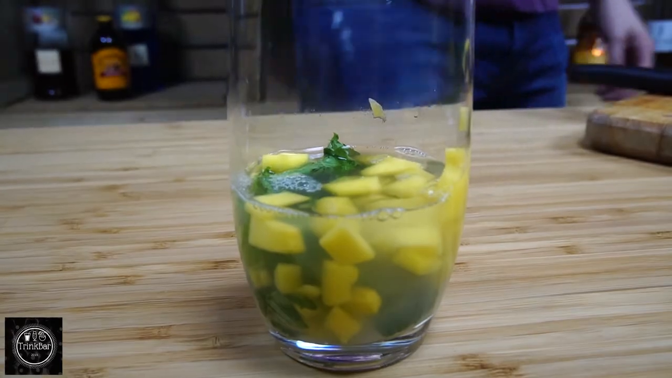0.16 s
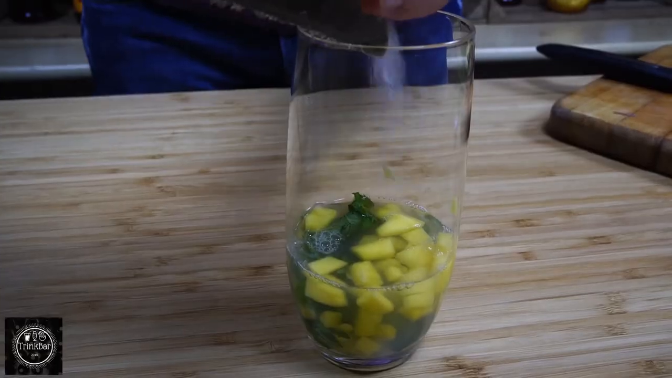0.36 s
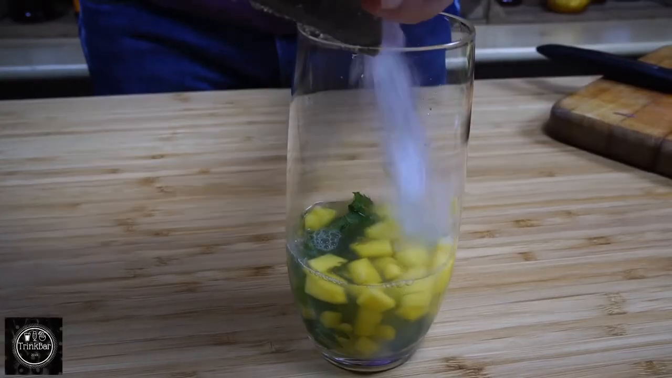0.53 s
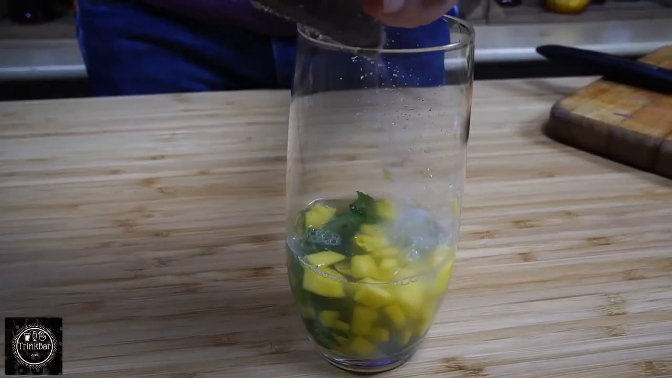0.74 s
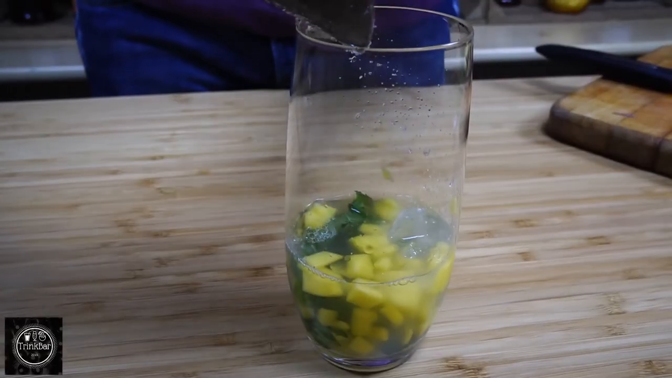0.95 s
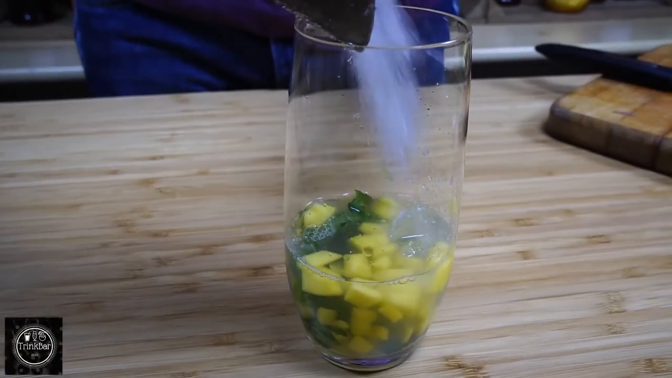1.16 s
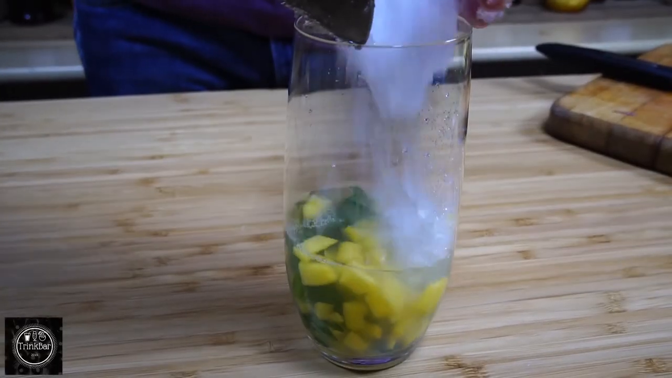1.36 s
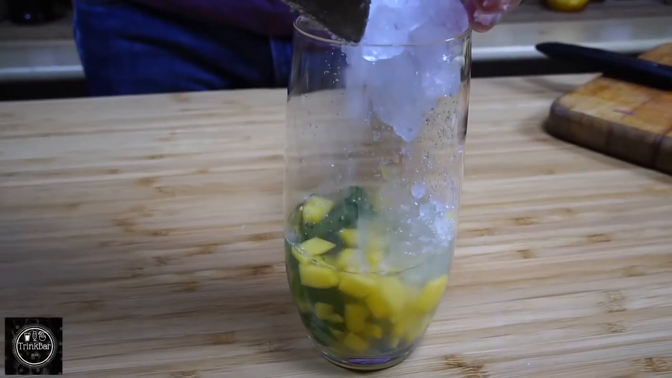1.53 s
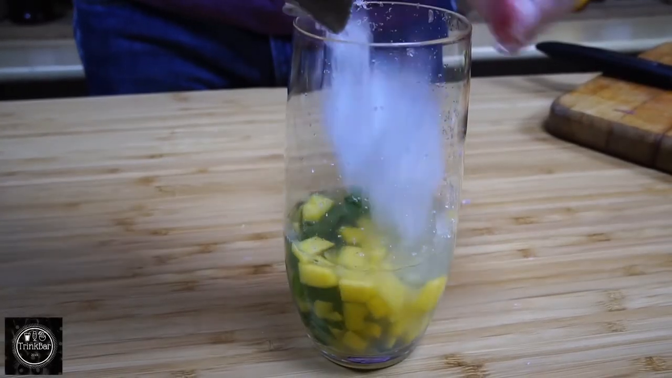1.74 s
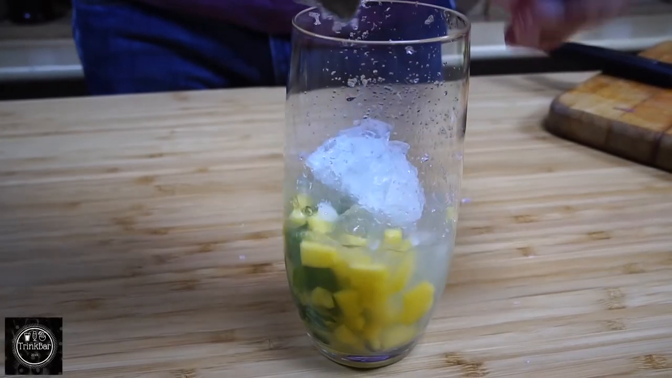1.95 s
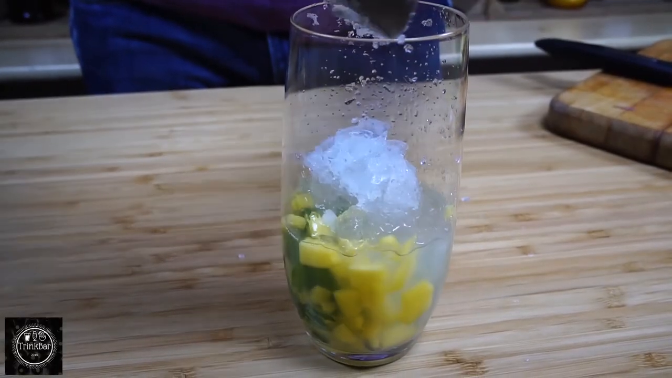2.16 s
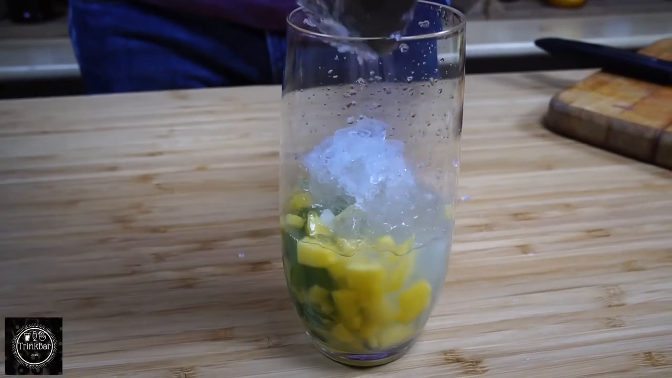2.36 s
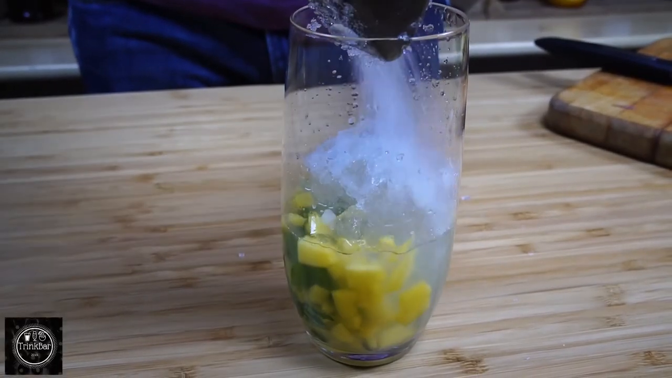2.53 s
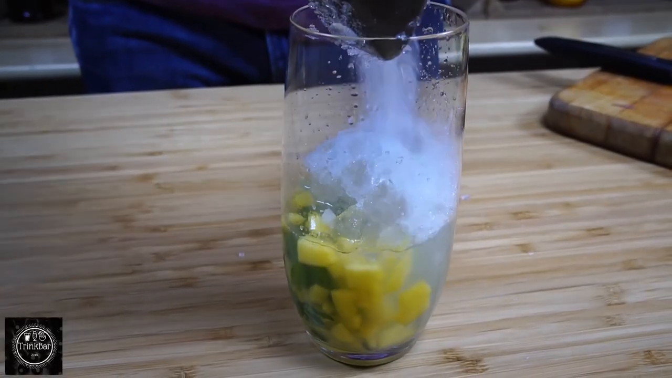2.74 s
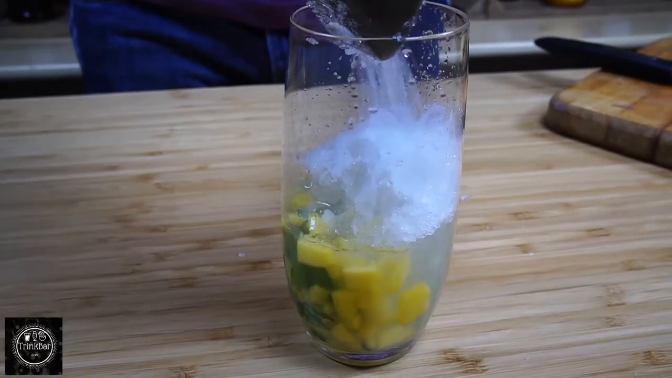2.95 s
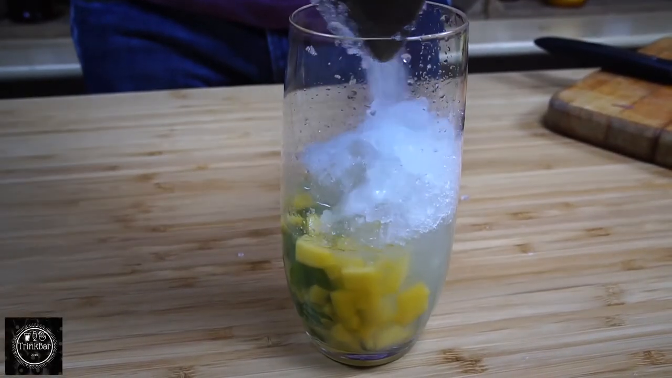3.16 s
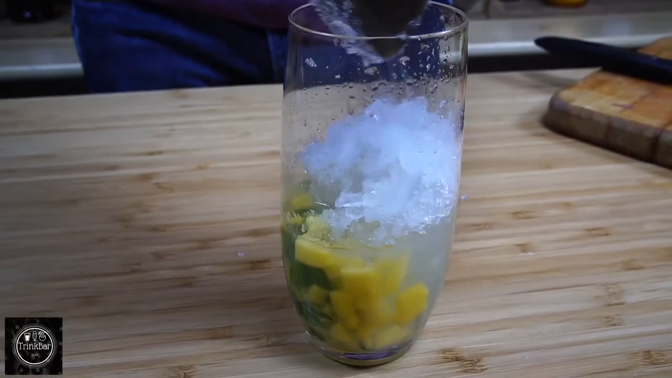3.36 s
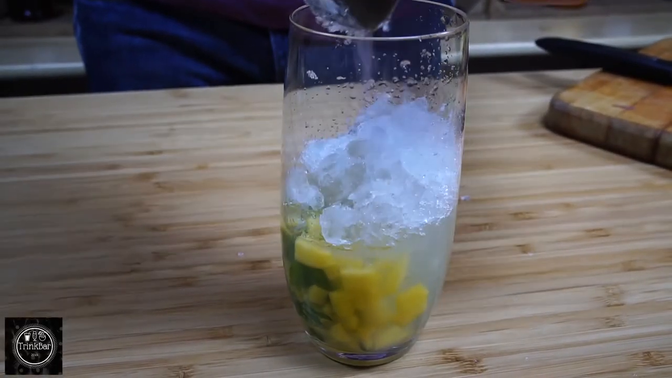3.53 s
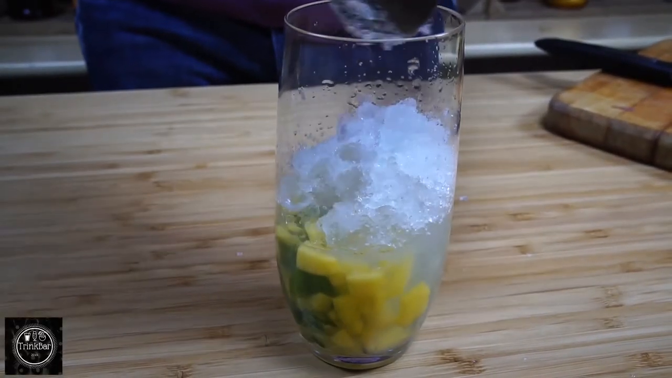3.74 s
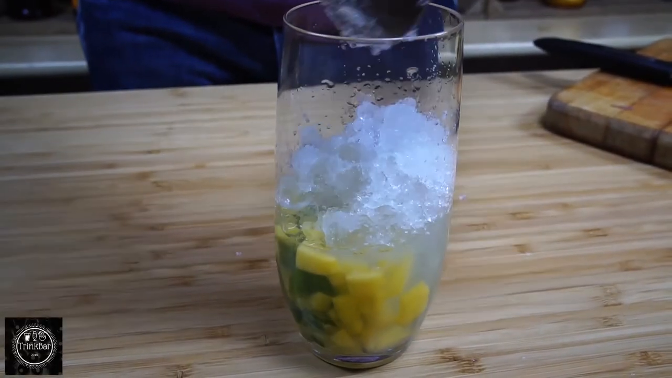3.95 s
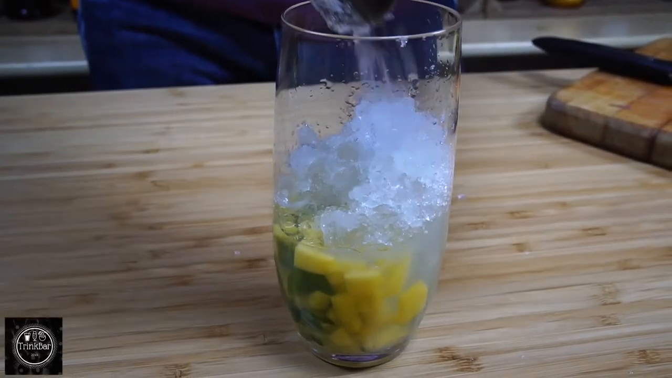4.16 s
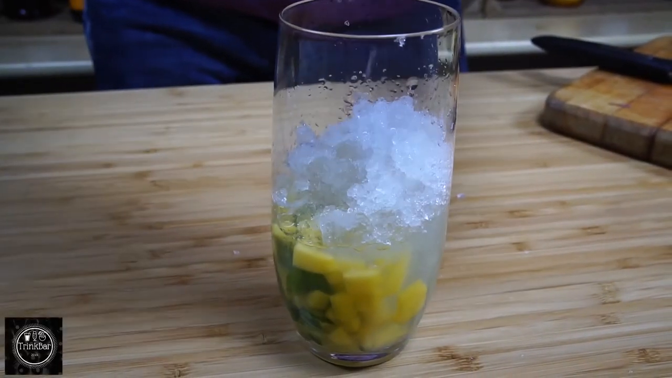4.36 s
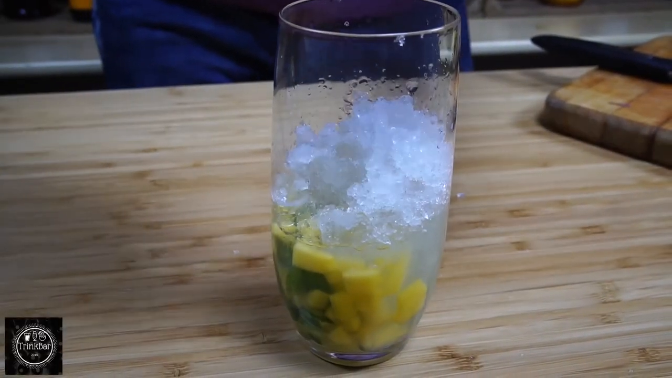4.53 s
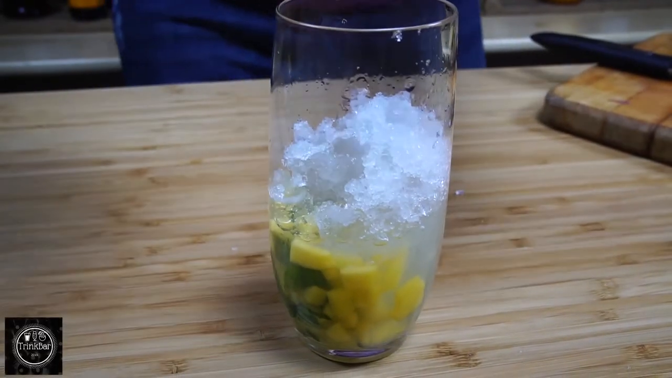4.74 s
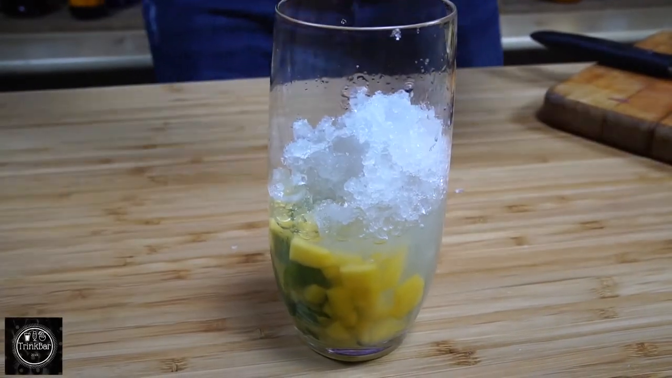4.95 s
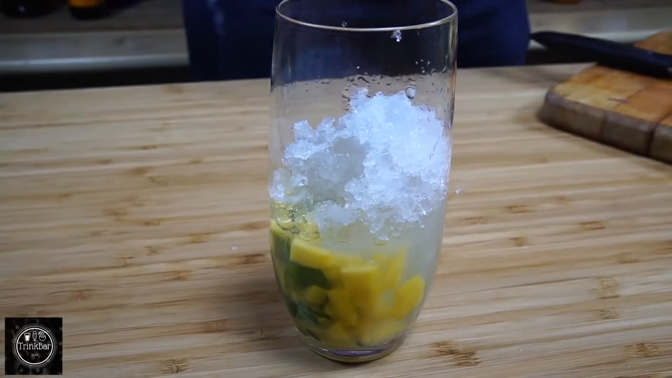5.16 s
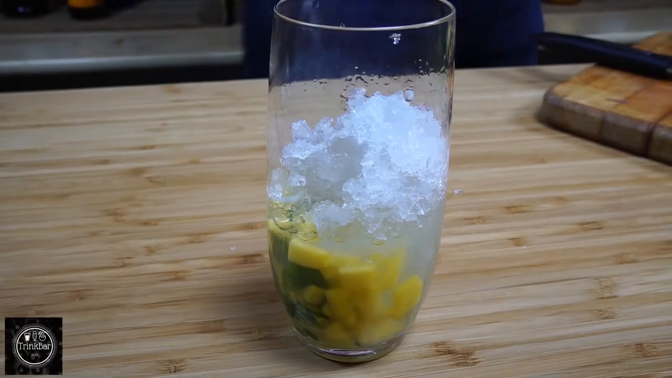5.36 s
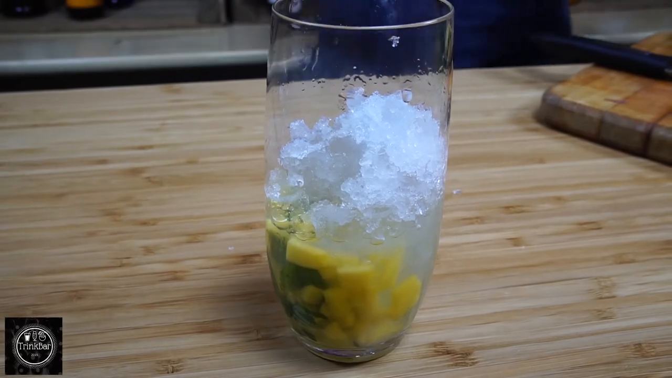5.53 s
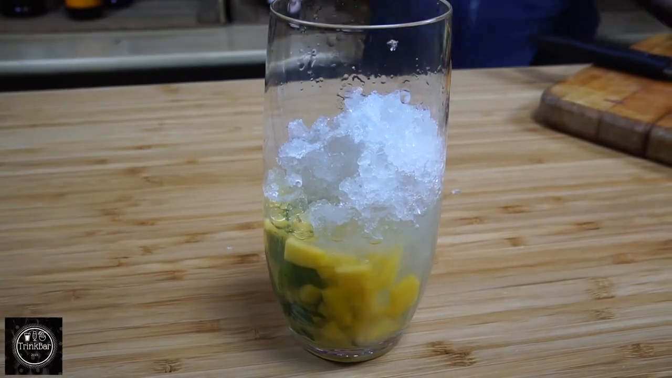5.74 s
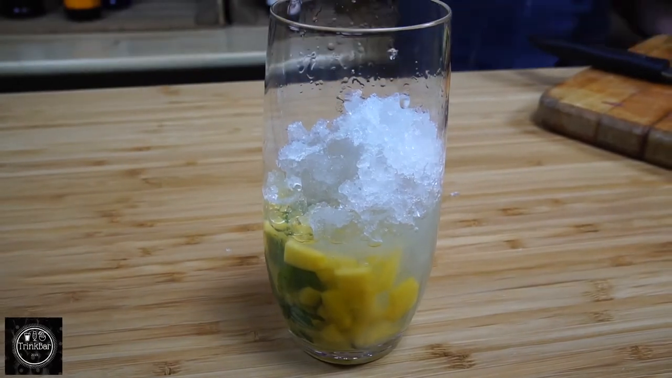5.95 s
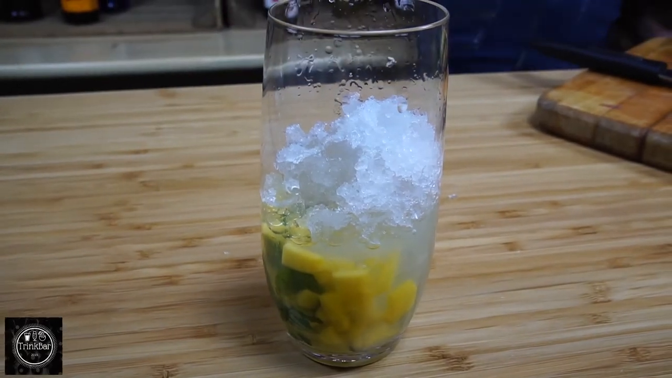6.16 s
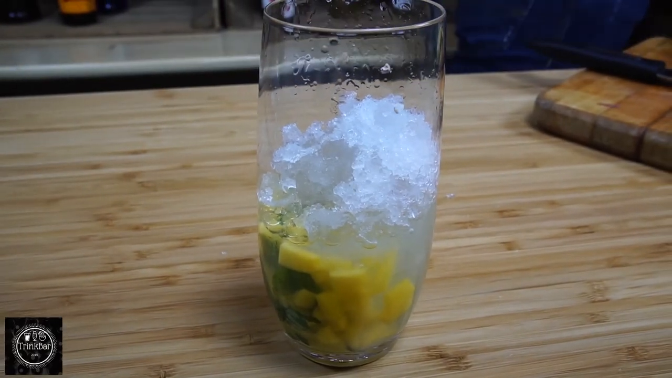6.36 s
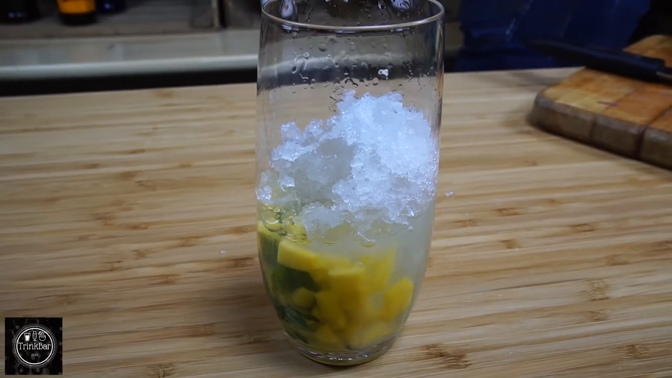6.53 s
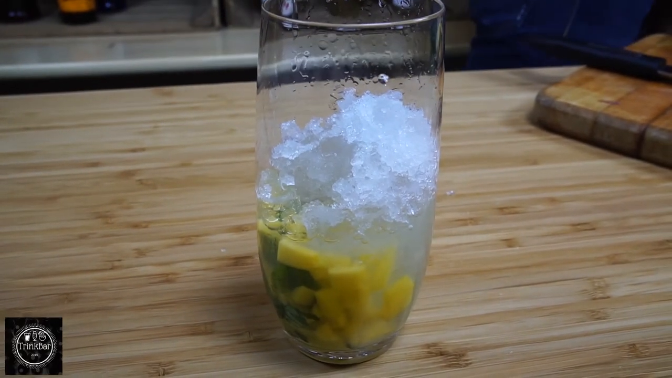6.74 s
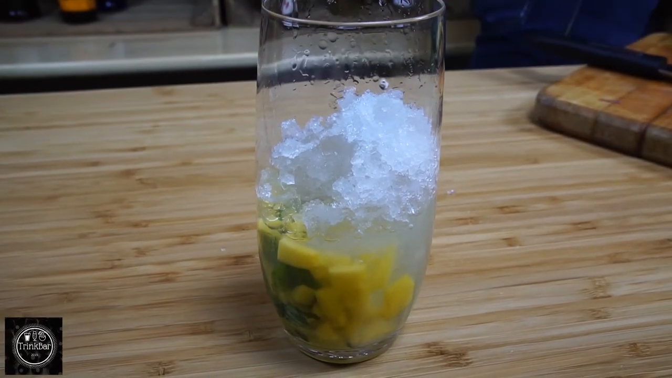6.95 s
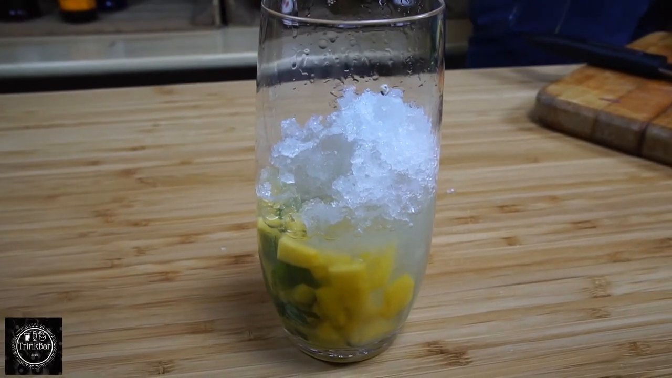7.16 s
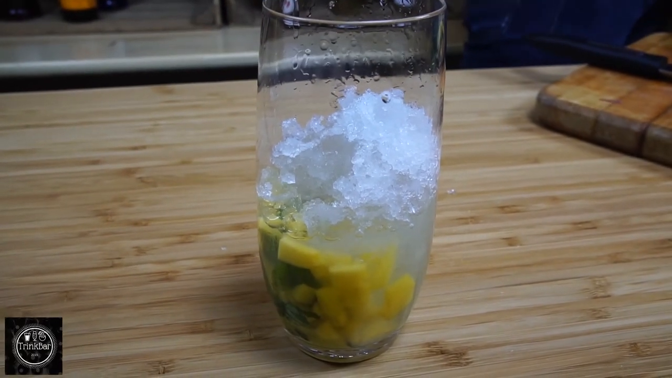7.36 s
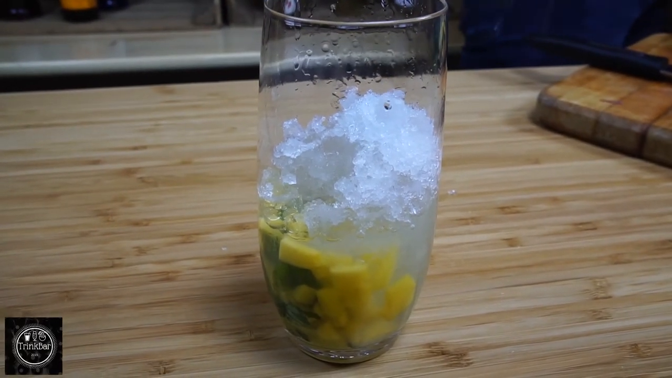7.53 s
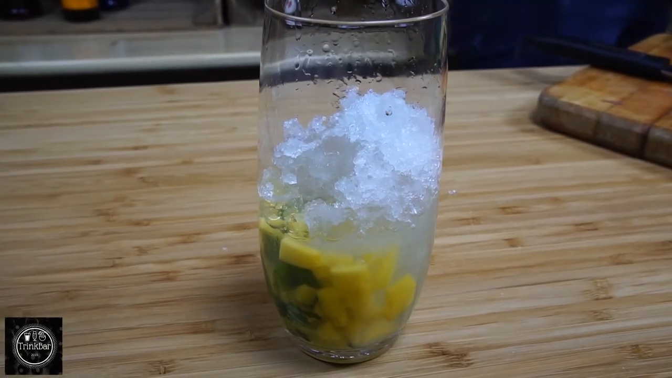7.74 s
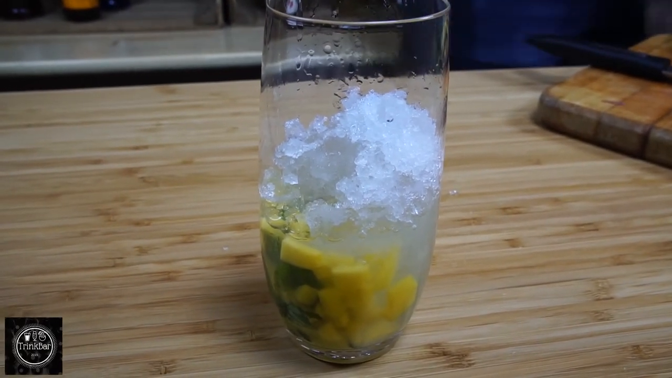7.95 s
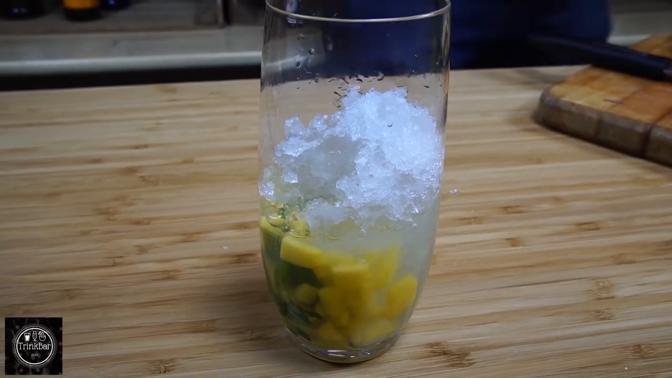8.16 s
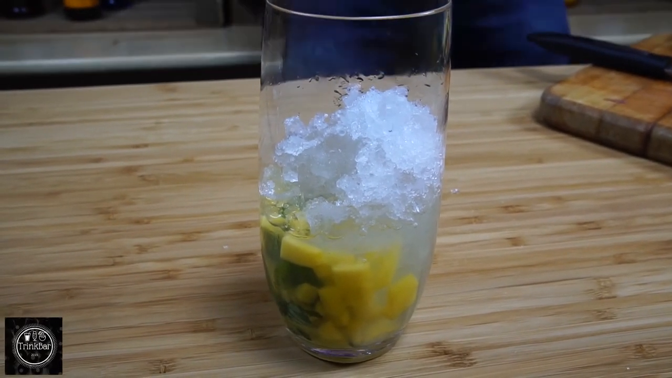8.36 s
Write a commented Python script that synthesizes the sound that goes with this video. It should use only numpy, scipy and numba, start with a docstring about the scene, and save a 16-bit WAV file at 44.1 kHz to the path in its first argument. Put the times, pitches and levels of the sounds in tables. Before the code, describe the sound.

Close up, crushed ice falls from a metal scoop into a tall glass in uneven spurts, with sharp cracks, glassy clacks and soft thuds through the wooden worktop. The rustle thins to stray ticks. After a brief quiet, further back in a small kitchen, the scoop crunches into stored ice, a drawer rumbles in and a cabinet door thumps shut.

```python
"""Crushed ice into a glass

Crushed ice slides off a metal scoop into a tall glass on a wooden worktop, heard close up.
Showers of tiny noise bursts make the rustle, clatter and drumming; single bursts make cracks and knocks, with
damped modes for scoop and board, and two gliding resonances for the air above the ice, higher as the glass fills.
Then, further back in the kitchen, the scoop drops into the ice store, a drawer slides in and a door thumps shut:
more showers and low noise, with the damped modes of a hollow cabinet. Quiet room air lies under it all."""
import sys
import numpy as np
from scipy import signal
from scipy.fft import rfft, irfft
from scipy.io import wavfile
from numba import njit

SR = 44100
rng = np.random.default_rng(int(sys.argv[2]) if len(sys.argv) > 2 else 0)


def digitize_waveform(pressure):
    """Quantize a signal to 16-bit integers and store it at the path in sys.argv[1].

    Rows of a 2-D input are taken as channels; values are limited to [-1, 1].
    """
    field = np.atleast_2d(pressure).T
    bounded = np.clip(field, -1, 1)
    quanta = np.round(bounded * 32767).astype(np.int16)
    wavfile.write(sys.argv[1], SR, quanta)


N = 374850  # length in samples, 8.5 s
TOP_HZ = 15750  # upper edge of the sound

# Event levels are relative: each layer adds its own trim when it plays them.
# scoop and lumps knocking the glass:
# [t/s, clack level/dB, board thud level/dB, push on the air in the glass re clack/dB]
KNOCKS = [(0.2354, -13.5, -26.5, -3), (0.245, -6.5, -24.5, -17), (0.334, -22.5, -44, -6),
          (0.451, -24, -53, 0), (0.706, -10, -34, -13), (1.024, -14.5, -30.5, -12),
          (1.181, -17, -36, -17.5), (1.344, 0, -13.5, -23), (1.365, -22, -20, -12),
          (1.398, -22.5, -22.5, -10.5), (1.439, -16, -30, -10), (1.455, -15.5, -20.5, 4),
          (1.672, -24, -26.5, -1.5), (1.705, -20.5, -28.5, -16.5), (1.786, -5.5, -23, -10.5),
          (1.804, -7.5, -26.5, -24.5), (2.134, -6, -18, 0.5), (2.317, -39.5, -32.5, 17.5),
          (2.371, -2, -12.5, -12), (2.432, -22, -16, 0), (3.212, -29, -38, 2), (3.644, -7.5, -14.5, -0.5),
          (3.741, -13, -10, 2.5), (3.76, -20.5, -15.5, 6.5), (3.838, -19.5, -25, 4),
          (3.911, -29, -23, 11.5), (4.03, -17, -28, -11)]
# larger pieces of ice cracking against the glass: [t/s, level/dB]
CHIPS = [(0.183, -30.5), (0.247, -5.5), (0.471, 1.5), (0.64, -21), (0.7062, -3), (1.0224, -1.5),
         (1.1793, -10), (1.246, -6.5), (1.265, -4.5), (1.341, -19), (1.396, -3), (1.4383, -10), (1.455, 1),
         (1.6045, -15), (1.674, -13), (1.7873, -3.5), (1.9325, -18.5), (1.966, -14), (2.336, -13.5),
         (2.371, 1.5), (2.5292, -2), (2.539, -8), (2.561, -8), (2.6256, -8), (2.773, -12), (2.8644, -8.5),
         (2.9008, -12), (2.922, -15.5), (3.2119, -8.5), (3.3007, -8.5), (3.3443, -19), (3.478, -18.5),
         (3.505, -24), (3.5584, -19.5), (3.6406, -15), (4.0295, -12), (4.2433, -27.5), (4.419, -36),
         (4.5085, -34), (4.537, -29), (4.578, -37.5)]
# each tip of the scoop lets ice slide, a long run or a short clump:
# [t/s of full flow, build-up/s, length/s, fine chips level/dB, thinning/dB per s, coarse pieces re fine/dB]
SLIDES = [(0.47, 0.11, 0.18, -36.5, 14, -5.5), (1.049, 0.16, 0.45, -38, 11, -3),
          (1.321, 0.22, 0.018, -26, 11, -6), (1.372, 0.093, 0.088, -35, 43, 10.5),
          (1.567, 0.076, 0.15, -43.5, 0, 1.5), (1.809, 0.024, 0.12, -32, 77.5, -13),
          (2.357, 0.19, .1, -44, -2, 6), (2.524, 0.11, 0.0088, -27, 30, -11.5),
          (2.607, 0.054, 0.95, -35, 12.5, -5.5), (2.775, 0.018, 0.017, -37, 20, -3),
          (3.078, 0.017, 0.012, -29.5, 22, -5.5), (3.15, 0.024, .025, -35.5, 18, -4.5),
          (3.46, 0.22, 0.025, -54.5, 22, 12), (3.934, 0.11, 0.081, -34, 100, -2),
          (4.109, 0.15, 0.34, -49, 52, -16.5)]
# strokes in the ice store and along the drawer's runners:
# [t/s of full speed, build-up/s, length/s, hiss level/dB, slowing/dB per s, scrape re hiss/dB, rumble re hiss/dB]
STROKES = [(5.184, 0.037, 0.026, -69.5, 7.5, 6, -12.5), (5.54, 0.22, 0.99, -69, 2.5, 6.5, -15),
           (6.194, 0.11, 0.1, -53, 0, 2, 4), (6.295, 0.014, 0.032, -28.5, 53, 7, -14),
           (6.54, 0.16, 0.41, -49, -2.5, 6.5, 19.5), (6.747, 0.056, 0.0093, -47.5, 20, 12.5, -5),
           (6.883, 0.083, 0.045, -43, 30, 5, 9), (7.03, .08, 0.24, -65.5, 15, 14, 26),
           (7.255, .1, 0.24, -55.5, -5, 6.5, 19), (7.789, 0.017, .01, -58.5, 15, 3, 0),
           (7.98, 0.23, 0.46, -65.5, 5, 1.5, 5)]
# dull bumps of the drawer and its door: [t/s, boom level/dB, hard knock re boom/dB]
BUMPS = [(5.414, -22.5, -11), (5.449, -33, -14.5), (5.622, -39.5, 1), (6.307, -12, -15), (6.32, -9, -1),
         (6.488, -13.5, -11), (6.54, -13, 1.5), (6.867, -18, -7.5), (6.97, -5, -17), (7.062, -7, -35),
         (7.243, -21, -21), (7.361, -15.5, -29), (7.429, -14, -11.5), (7.464, -4, -10.5),
         (7.489, -8.5, -16), (7.524, -13, -19), (8.007, -29, -11)]

# resonances, each detuned a little at every blow: [f/Hz, level/dB, t60/s]
BOARD_MODES = [(79.7, -15, 0.36), (151.7, -1, 0.087), (209.2, 1, 0.073), (257.7, -0.5, 0.079),
               (343, 0.5, 0.053), (502.5, -10.5, 0.088), (710, -16.5, 0.026)]  # glass on the board
SCOOP_MODES = [(1172, 14.5, 0.0576), (1366, 3.5, 0.071), (2245, -1, 0.16), (3294, -11, 0.12)]  # metal scoop
CABINET_MODES = [(72.4, -14.5, 0.26), (137.7, 1, .14), (192.5, -1, 0.24), (257.6, 4, 0.058)]  # hollow cabinet
# air column above the ice, a pipe closed at the bottom: [t/s, lowest resonance f/Hz]
AIR_COLUMN = [(0.2, 635), (1.75, 660), (2.13, 825), (2.9, 865), (3.7, 870), (4.7, 905)]

# noise colours: [f/Hz, level/dB]
CLACK_COLOUR = [(60, -45), (250, -10.5), (470, 3), (600, -11), (820, 0), (1400, 1.5), (2000, -11),
                (2600, -9.5), (3500, -15), (6000, -31)]  # knock on the glass
CRACK_COLOUR = [(200, -35), (1000, -28.5), (2400, 0.5), (4000, 2.5), (7000, 3), (10000, -1.5),
                (15500, -5.5)]  # ice cracking
RUSTLE_COLOUR = [(1500, -20), (3200, -7.5), (5000, -1.5), (7300, -0.5), (8800, 0), (12500, -2.5),
                 (15500, -9.5)]  # fine chips
CLATTER_COLOUR = [(100, -33), (350, -17), (600, -3), (1400, 6.5), (1900, -4), (2500, 1.5), (3200, -2),
                  (6000, -15.5)]  # coarse pieces
DRUMMING_COLOUR = [(35, -34.5), (75, 0), (110, -9), (160, 6.5), (240, 1.5), (350, -4.5), (500, -1.5),
                   (750, -31.5), (1500, -28.5)]  # weight of the ice on the board
HISS_COLOUR = [(2000, -39), (3500, 3), (6000, 0.5), (9000, -5), (15500, -14)]  # bright part of a stroke
SCRAPE_COLOUR = [(100, -19), (350, -17), (650, 0), (1200, -1), (1900, -5), (2400, -3.5), (3600, -12),
                 (6500, -32)]  # middle part of a stroke
CABINET_COLOUR = [(30, -22), (70, 1), (110, -10), (150, -1.5), (210, 3), (270, -8), (400, -11), (900, -19),
                  (2500, -71)]  # low rumble of a stroke
PANEL_COLOUR = [(80, -18), (260, 0), (350, 4), (550, -1.5), (850, -11.5), (1400, -28.5), (4000, -51),
                (12000, -70.5)]  # hard knock on the cabinet panels
AIR_COLOUR = [(15, -21.5), (25, 4), (79, -12), (240, -13.5), (289, -16.5), (340, -16.5), (895, -19),
              (2120, -23), (15500, -28)]  # room air

# stereo width, side re mid: [f/Hz, level/dB]
NEAR_SIDE = [(100, -10), (2500, -20.5), (6000, -10), (14000, -2)]  # at the glass
FAR_SIDE = [(100, -8), (2400, -8.5), (8000, 0), (14000, 1)]  # at the drawer
AIR_SIDE = [(50, -2.5), (200, -1), (900, -7.5), (10000, -1)]  # room air
# colour of the kitchen's echo: [f/Hz, level/dB]
ECHO_COLOUR = [(100, 4), (300, -2.5), (700, 1), (1300, -2), (3500, -4), (14000, -2.5)]

ONSET_DB = 23.5  # a slide or stroke swells by this much during its build-up
SLIDE_STOP_DB_PER_S = 149  # how fast a slide runs out once the scoop is level
STROKE_STOP_DB_PER_S = 164  # how fast a stroke dies away
SURGE_DB, SURGE_PER_S = 4.5, 45  # crushed ice clings together, so it falls in uneven spurts
CATCH_DB, CATCH_PER_S = 1.5, 25  # the runners catch and slip
STRAY_PER_S, STRAY_DB = 55, -4.5  # small chips that skip off the stream; level re the fine flow


def amp(db):
    """Decibels to gain."""
    return 10 ** (np.asarray(db) / 20)


def at(points, hz):
    """Read (Hz, value) points on a log-frequency axis."""
    f, value = np.transpose(points)
    return np.interp(np.log(np.maximum(hz, 1)), np.log(f), value)


def fade(t60, size):
    """Exponential decay by 60 dB in t60 seconds."""
    return amp(-60 * np.arange(size) / SR / t60)


def noise(spectrum, side, size, ripple_db=0, count=40):
    """Stereo noise of rms 1 with a given colour and width; ripple gives a piece of ice resonances of its own."""
    hz = np.arange(size // 2 + 1) * SR / size
    ripple_points = np.c_[np.geomspace(300, TOP_HZ, count), rng.standard_normal(count)]
    gain = amp(at(spectrum, hz) + ripple_db * at(ripple_points, hz))
    mid, side_part = np.exp(2j * np.pi * rng.random((2, len(hz)))) * gain
    side_part = side_part * amp(at(side, hz))
    stereo = irfft([mid + side_part, mid - side_part], size)
    return stereo / stereo.std()


def burst(spectrum, side, t60, size=8192, **colour):
    """A blow into countless close modes: coloured noise that dies away."""
    decay = fade(t60, size)
    y = noise(spectrum, side, size, **colour) * decay
    # every burst carries the same energy for its decay time
    return y * np.sqrt(2 * np.sum(decay ** 2) / np.sum(y ** 2))


def ring(modes, scatter, size=8192):
    """Damped modes with peak 1; each blow lands elsewhere and shifts them a little."""
    t = np.arange(size) / SR
    y = np.zeros(size)
    for k, (hz, db, t60) in enumerate(modes):
        shifted_hz = hz * (1 + scatter * rng.standard_normal())
        polarity = (-1) ** k
        y += polarity * amp(db) * fade(t60, size) * np.sin(2 * np.pi * shifted_hz * t)
    return y / np.abs(y).max()


def add(out, s, sound):
    """Mix a sound in at time s."""
    i = int(s * SR)
    out[:, i:i + sound.shape[-1]] += sound[..., :N - i]


def grains(spectrum, side, rate, spread_db, t60, count=6):
    """A shower of rms 1, rate tiny blows a second: several kinds of piece, with widely spread strengths."""
    out = np.zeros((2, N))
    for _ in range(count):
        when = np.flatnonzero(rng.random(N) < rate / count / SR)
        weight = rng.laplace(size=len(when))
        blows = np.zeros(N)
        blows[when] = np.sign(weight) * amp(spread_db * np.minimum(np.abs(weight), 4))
        piece = burst(spectrum, side, t60, size=2048)
        out += signal.oaconvolve(blows[None], piece, axes=1)[:, :N]
    return out / out.std()


def gesture(s, build_s, length_s, sag_db_per_s, stop_db_per_s):
    """Gain of one movement: it swells up to time s, sags while it lasts, then dies away."""
    t = np.arange(N) / SR - s
    swell = ONSET_DB * np.minimum(t, 0) / max(build_s, 1 / SR)
    sag = sag_db_per_s * np.clip(t, 0, length_s)
    stop = stop_db_per_s * np.maximum(t - length_s, 0)
    return amp(np.maximum(swell - sag - stop, -120))


def unevenness(spread_db, rate):
    """A gain that wanders at random, heading for a new level rate times a second."""
    steps = np.arange(N) / SR * rate
    return amp(spread_db * np.interp(steps, np.arange(2048), rng.standard_normal(2048)))


@njit
def resonate(x, hz, width):
    """State-variable band-pass with a moving centre and a bandwidth in Hz, gain 1 at the centre."""
    y, band, low = np.empty(len(x)), 0., 0.
    for i in range(len(x)):
        g, damping = np.tan(np.pi * hz[i] / SR), width / hz[i]
        # the tiny offset keeps the decaying state from sinking into very slow arithmetic
        v = (band + g * (x[i] + 1e-18 - low)) / (1 + g * (g + damping))
        band = 2 * v - band
        low = low + 2 * g * v
        y[i] = damping * v
    return y


def air_column(x, first_db=8, second_db=-1, ratio=2.84):
    """The first two resonances of the air in the glass, which shortens as the ice piles up."""
    hz = np.interp(np.arange(N) / SR, *np.transpose(AIR_COLUMN))
    mono = x.mean(axis=0)
    # the rough bed of ice damps both, the upper one more
    first = resonate(mono, hz, 65.)
    second = resonate(mono, hz * ratio, 220.)
    return amp(first_db) * first + amp(second_db) * second


def kitchen(x, wet_db, gap_s, likeness, t60=0.49, dull_hz=6000, size=32768):
    """Add the room: diffuse echoes that build up and fade, the treble first."""
    hz = np.arange(size // 2 + 1) * SR / size
    centres = np.geomspace(60, 15360, 9)  # octave bands
    common, left, right = rfft(rng.standard_normal((3, size)))
    # likeness: how much the two ears share
    field = likeness * common + np.array([left, right])
    build = 1 - np.exp(-(np.arange(size) / SR / gap_s) ** 2)
    tail = 0
    for centre, weights in zip(centres, np.eye(len(centres))):
        decay = build * fade(t60 / (1 + centre / dull_hz), size)
        band = irfft(field * at(np.c_[centres, weights], hz))
        tail = tail + band * decay / np.linalg.norm(decay) * amp(at(ECHO_COLOUR, centre))
    tail = tail * amp(wet_db) / np.hypot(1, likeness)
    return x + signal.oaconvolve(x.mean(axis=0)[None], tail, axes=1)[:, :N]


def room_air():
    """Quiet steady noise of the room, heaviest in the deep bass."""
    return amp(-56) * noise(AIR_COLOUR, AIR_SIDE, N)


def chips(echo_s=0.0017, echo_db=0.0):
    """Hard, bright cracks with a short spray of splinters; the worktop throws each crack back a moment later."""
    out = np.zeros((2, N))
    for s, db in CHIPS:
        snap = amp(-10.0) * burst(CRACK_COLOUR, NEAR_SIDE, t60=0.003)
        splinters = amp(-14.5) * burst(CRACK_COLOUR, NEAR_SIDE, t60=0.035, ripple_db=7.5)
        add(out, s, amp(db) * (snap + splinters))
        add(out, s + echo_s, amp(db + echo_db) * snap)
    return out


def knocks():
    """Each knock clacks, rings the scoop, thuds through the board and jolts the air in the glass."""
    out, jolts = np.zeros((2, 2, N))
    push = np.hanning(24)  # a smooth pulse of about half a millisecond
    for s, clack_db, thud_db, air_db in KNOCKS:
        add(out, s, amp(clack_db - 6.5) * burst(CLACK_COLOUR, NEAR_SIDE, t60=0.029, ripple_db=4))
        add(out, s, amp(clack_db - 18) * ring(SCOOP_MODES, scatter=0.031))
        add(out, s, amp(thud_db + 6.5) * ring(BOARD_MODES, scatter=0.05))
        add(jolts, s, amp(clack_db + air_db + 8.5) * push)
    return out + air_column(jolts)


def pour():
    """Fine chips rustle, coarse ones clatter, both stir the air in the glass, and their weight drums on the board."""
    power = np.zeros((2, N))
    for s, build_s, length_s, db, thinning, coarse_db in SLIDES:
        flow = amp(db) * gesture(s, build_s, length_s, thinning, SLIDE_STOP_DB_PER_S)
        power += np.array([flow, amp(coarse_db) * flow]) ** 2
    fine, coarse = np.sqrt(power) * unevenness(SURGE_DB, SURGE_PER_S)
    pieces = grains(CLATTER_COLOUR, NEAR_SIDE, rate=710, spread_db=2.5, t60=0.024)
    crystals = grains(RUSTLE_COLOUR, NEAR_SIDE, rate=700, spread_db=2.8, t60=0.005)
    skips = grains(CRACK_COLOUR, NEAR_SIDE, rate=STRAY_PER_S, spread_db=1.5, t60=0.022)
    rustle = fine * amp(0.5) * crystals
    strays = fine * amp(STRAY_DB) * skips
    clatter = coarse * amp(-3.0) * pieces
    drumming = coarse * grains(DRUMMING_COLOUR, NEAR_SIDE, rate=800, spread_db=2, t60=0.051)
    stirring = (coarse + amp(-7) * fine) * pieces
    hollow = air_column(stirring, first_db=7, second_db=-7)
    return rustle + strays + clatter + drumming + hollow


def drawer():
    """The scoop crunches into the stored ice, then the drawer scrapes and rumbles along its runners."""
    power = np.zeros((3, N))
    for s, build_s, length_s, db, slowing, scrape_db, rumble_db in STROKES:
        speed = amp(db) * gesture(s, build_s, length_s, slowing, STROKE_STOP_DB_PER_S)
        power += np.array([speed, amp(scrape_db) * speed, amp(rumble_db) * speed]) ** 2
    hiss_gain, scrape_gain, rumble_gain = np.sqrt(power) * unevenness(CATCH_DB, CATCH_PER_S)
    hiss = grains(HISS_COLOUR, FAR_SIDE, rate=5500, spread_db=2.5, t60=0.036)
    scrape = grains(SCRAPE_COLOUR, FAR_SIDE, rate=1400, spread_db=3.5, t60=0.028)
    rumble = noise(CABINET_COLOUR, FAR_SIDE, N)
    return (hiss_gain * amp(3.0) * hiss
            + scrape_gain * amp(1.0) * scrape
            + rumble_gain * amp(-2.5) * rumble)


def bumps():
    """Heavy contacts set the hollow cabinet booming; the harder ones also knock on its panels."""
    out = np.zeros((2, N))
    for s, db, hard_db in BUMPS:
        boom = ring(CABINET_MODES, scatter=0.078)
        knock = burst(PANEL_COLOUR, FAR_SIDE, t60=0.12, ripple_db=7.5)
        # a padded contact builds up over a few milliseconds, without a click
        contact = (1 - fade(.015, len(boom))) ** 2
        add(out, s, amp(db) * contact * (amp(-2.5) * boom + amp(hard_db - 1.0) * knock))
    return out


def scene(low_cut_hz=50):
    """The glass close by, the drawer further off and a little to the right, over quiet room air."""
    near = kitchen(chips() + knocks() + pour(), wet_db=-6.0, gap_s=0.0009, likeness=1.0)
    far = kitchen(drawer() + bumps(), wet_db=-2.5, gap_s=0.012, likeness=0.88)
    far = far * amp([[-.8], [.8]])  # left, right
    # the glass and the drawer carry none of the deepest bass
    low_cut = signal.butter(2, low_cut_hz, "high", fs=SR, output="sos")
    return signal.sosfilt(low_cut, near + far) + room_air()


def record(dry):
    """Clip at full scale, then cut the top with a steep low-pass."""
    top_cut = signal.ellip(10, .2, 70, TOP_HZ, fs=SR, output="sos")
    return signal.sosfilt(top_cut, np.clip(dry, -1, 1))


dry = scene()
out = record(dry)
digitize_waveform(out)
```